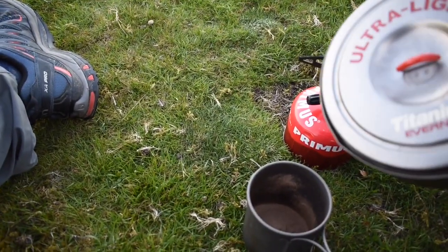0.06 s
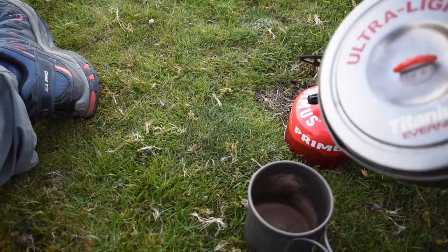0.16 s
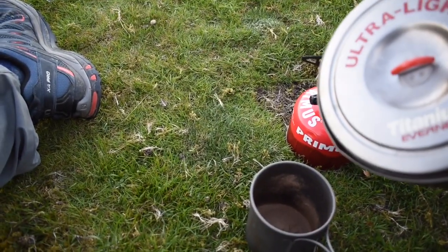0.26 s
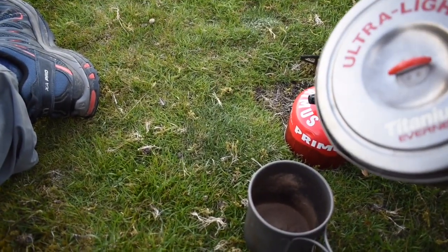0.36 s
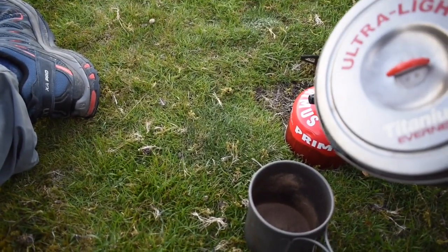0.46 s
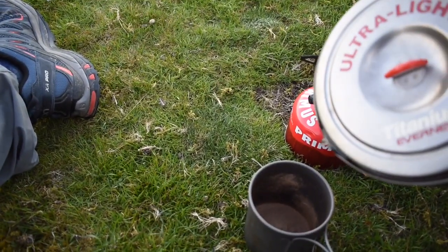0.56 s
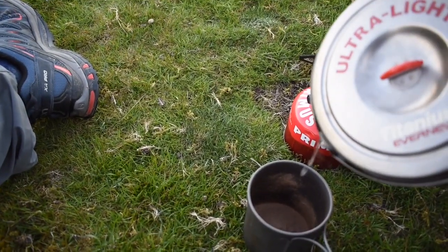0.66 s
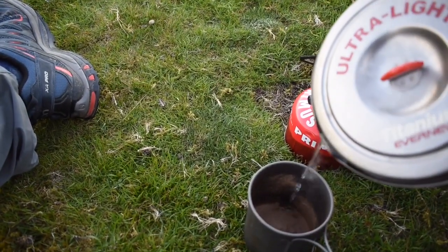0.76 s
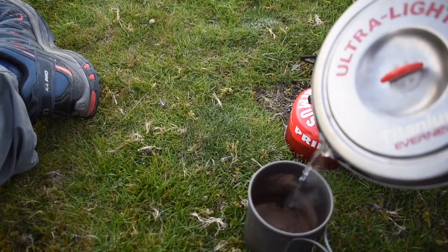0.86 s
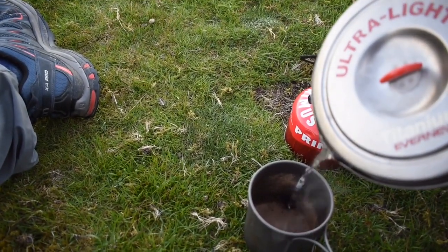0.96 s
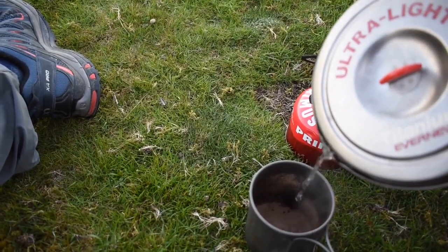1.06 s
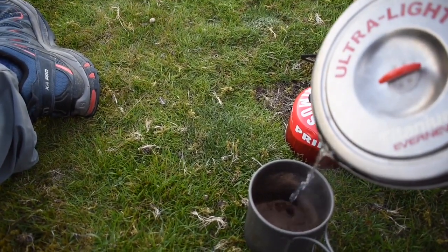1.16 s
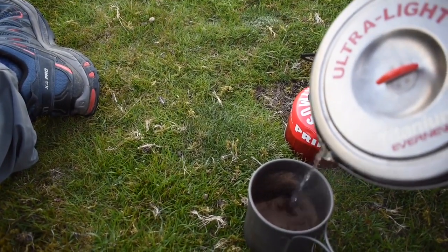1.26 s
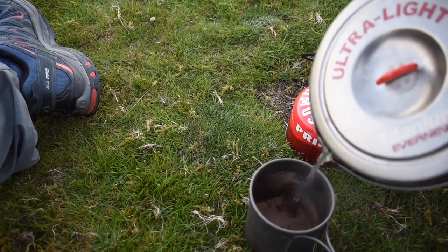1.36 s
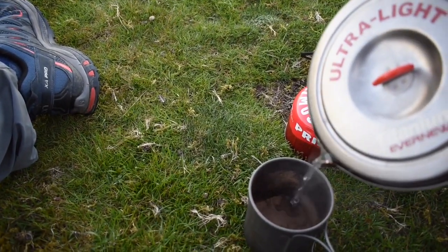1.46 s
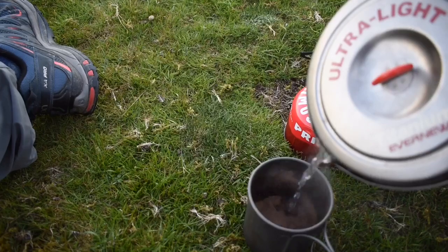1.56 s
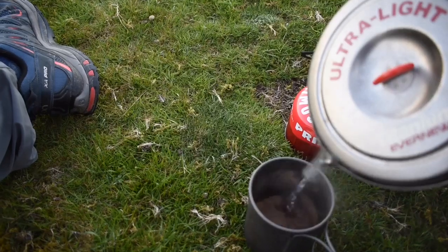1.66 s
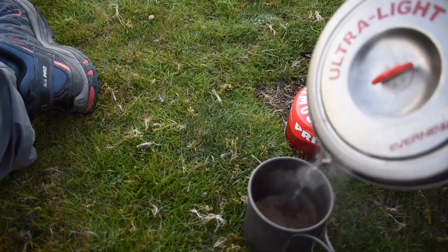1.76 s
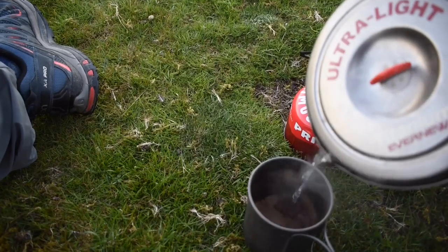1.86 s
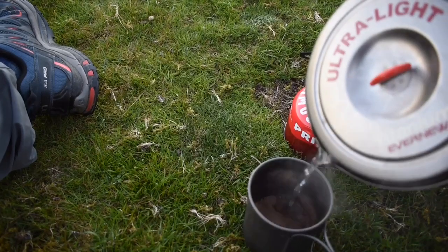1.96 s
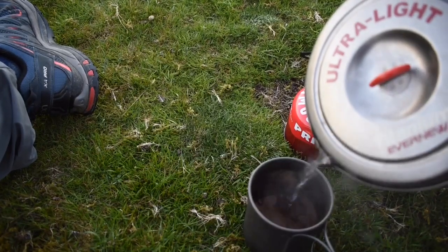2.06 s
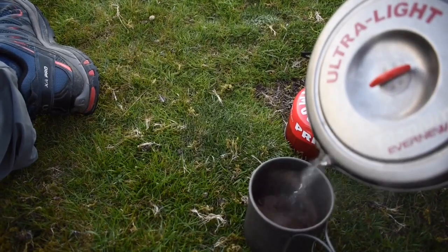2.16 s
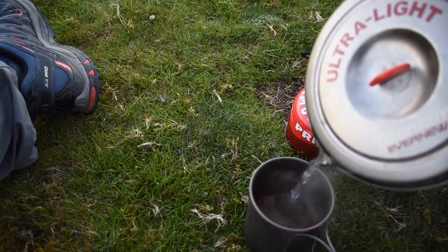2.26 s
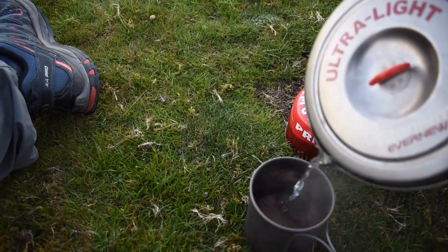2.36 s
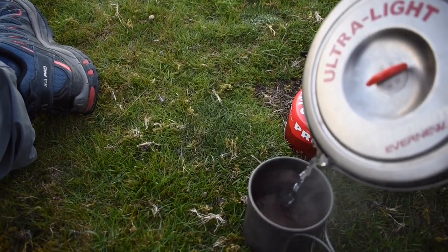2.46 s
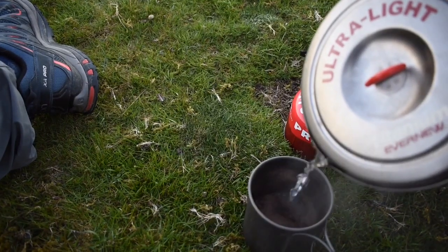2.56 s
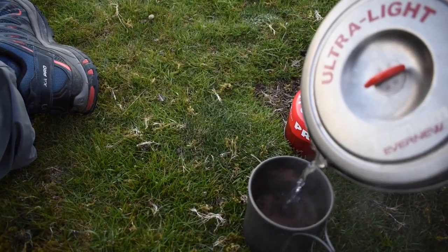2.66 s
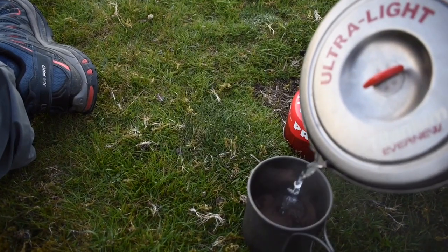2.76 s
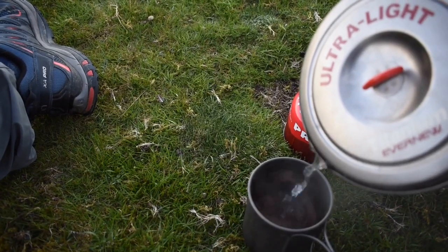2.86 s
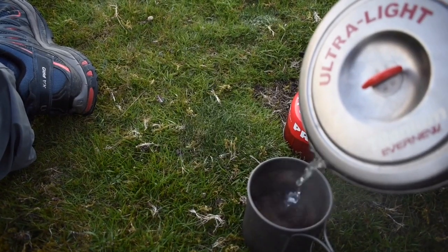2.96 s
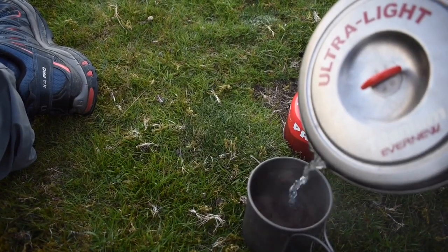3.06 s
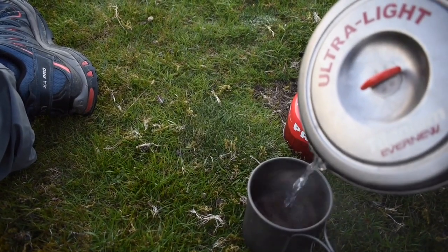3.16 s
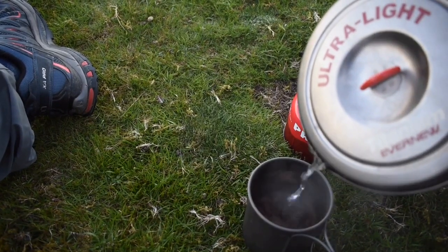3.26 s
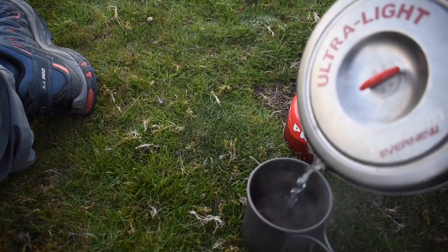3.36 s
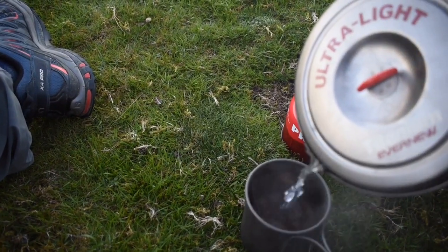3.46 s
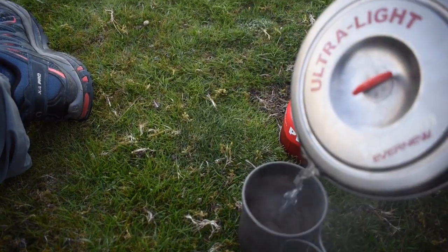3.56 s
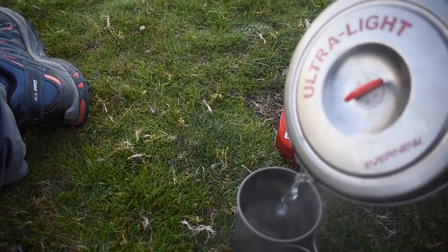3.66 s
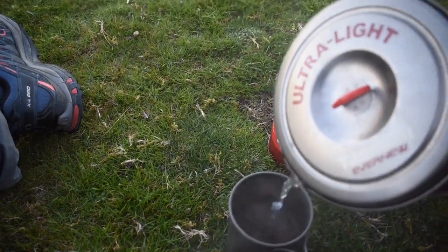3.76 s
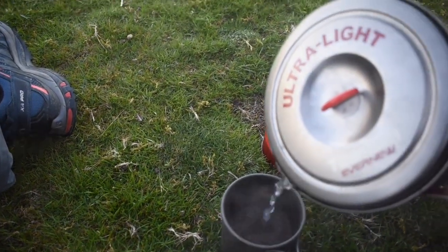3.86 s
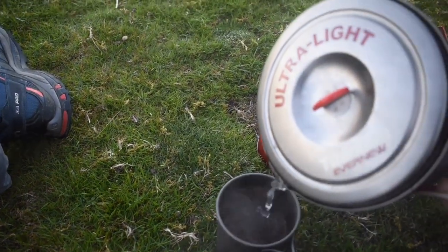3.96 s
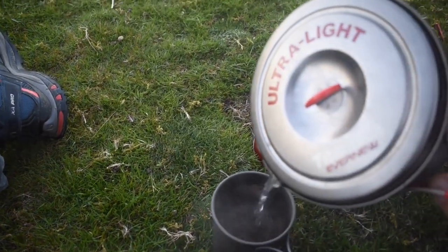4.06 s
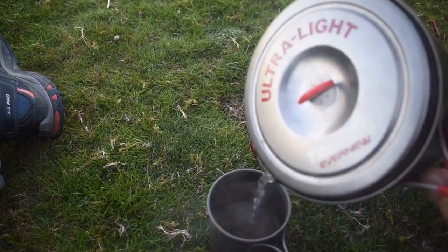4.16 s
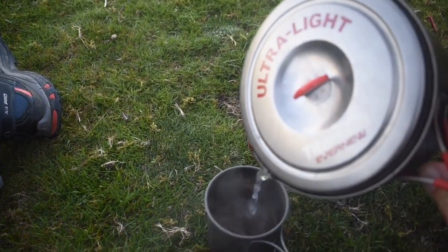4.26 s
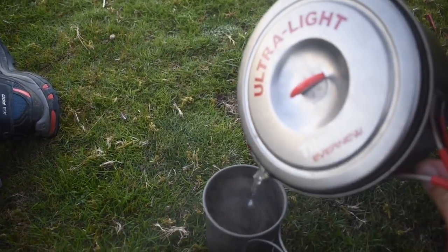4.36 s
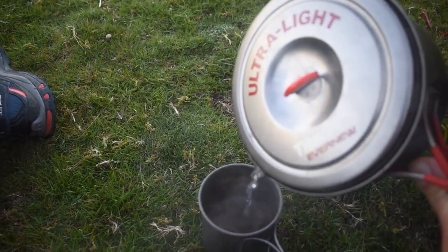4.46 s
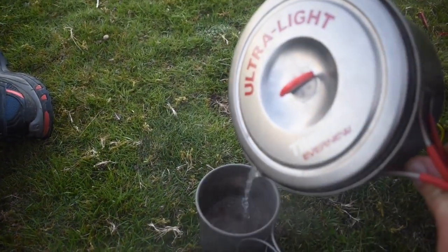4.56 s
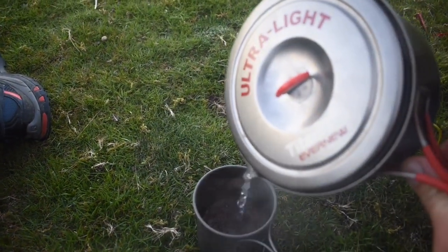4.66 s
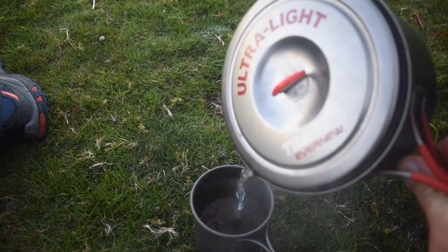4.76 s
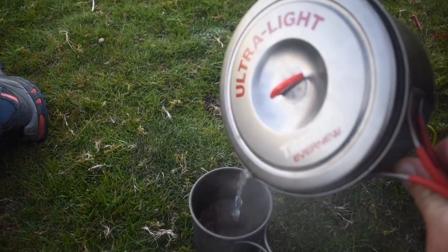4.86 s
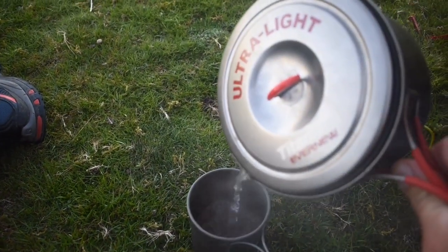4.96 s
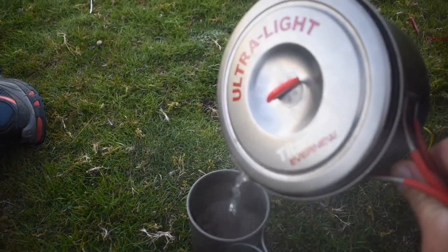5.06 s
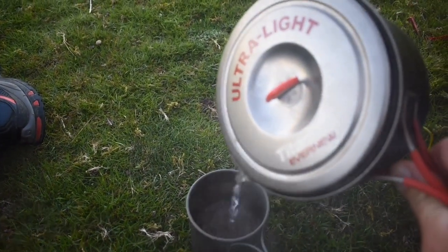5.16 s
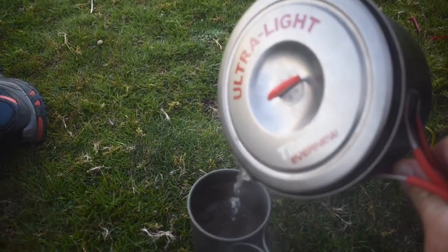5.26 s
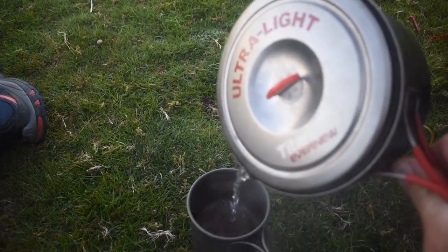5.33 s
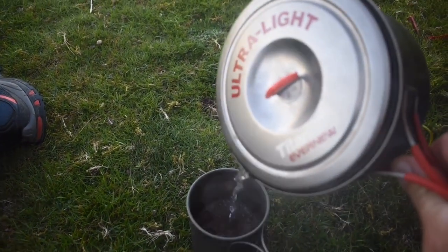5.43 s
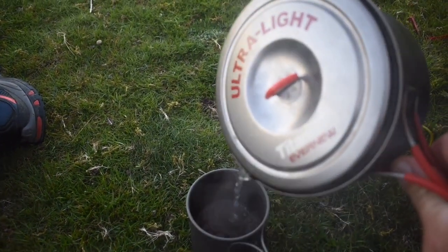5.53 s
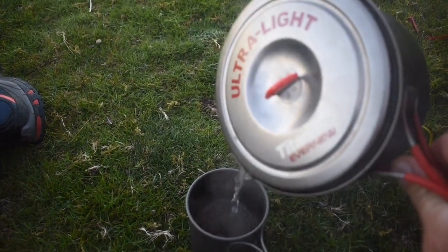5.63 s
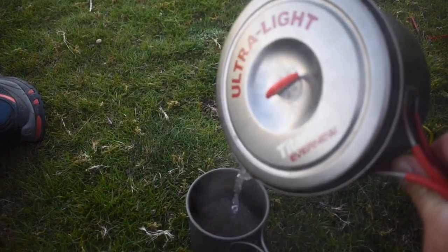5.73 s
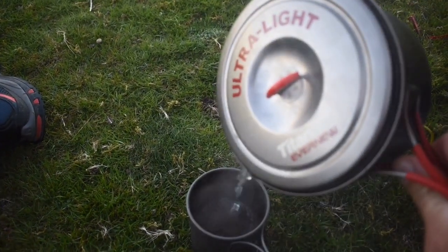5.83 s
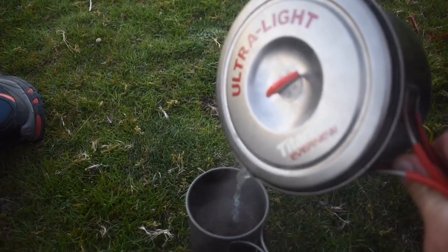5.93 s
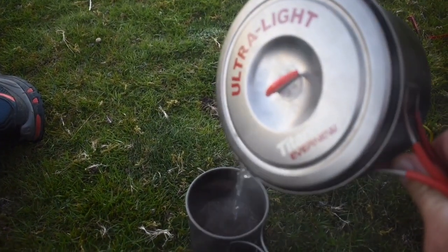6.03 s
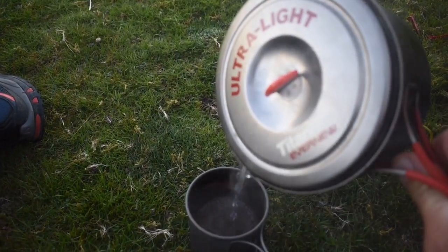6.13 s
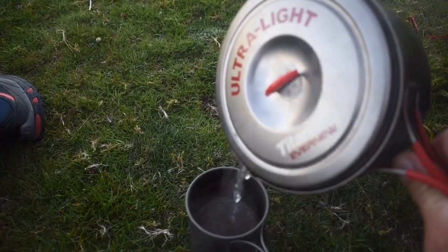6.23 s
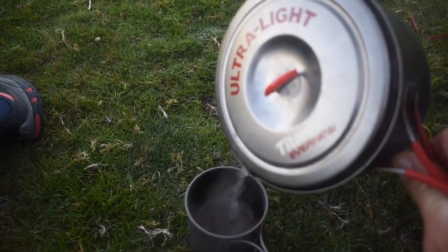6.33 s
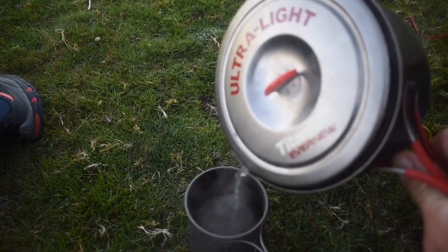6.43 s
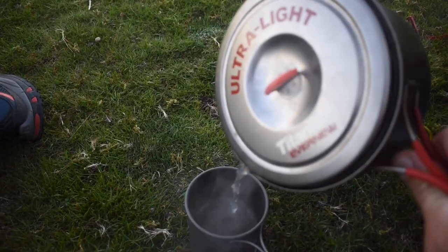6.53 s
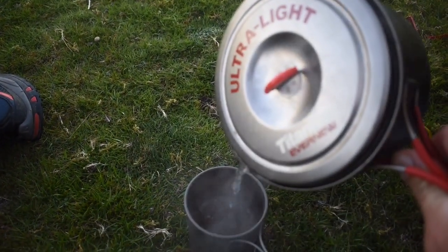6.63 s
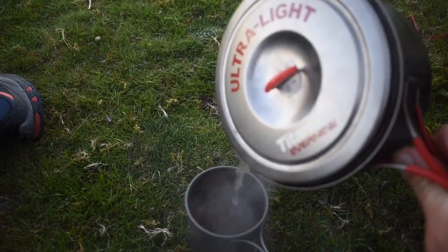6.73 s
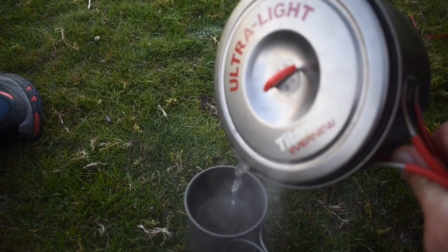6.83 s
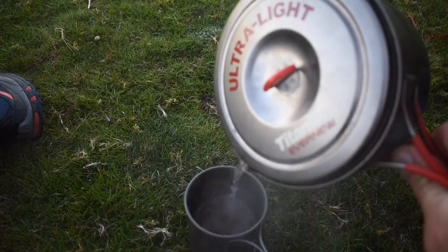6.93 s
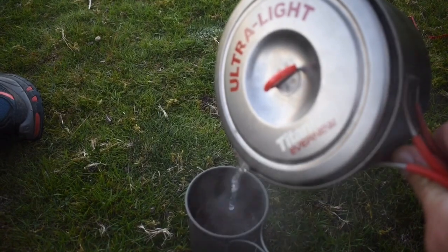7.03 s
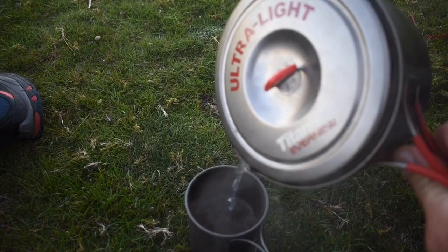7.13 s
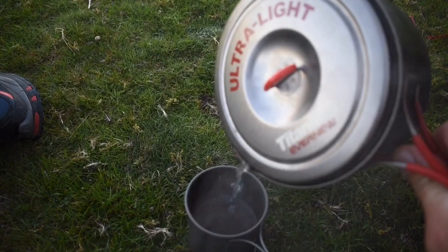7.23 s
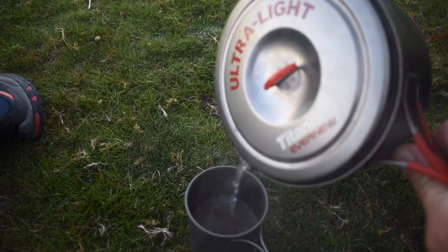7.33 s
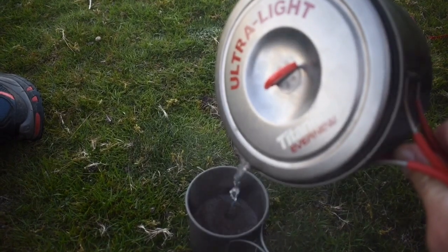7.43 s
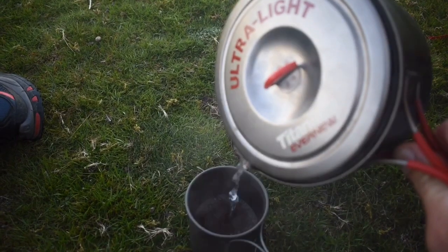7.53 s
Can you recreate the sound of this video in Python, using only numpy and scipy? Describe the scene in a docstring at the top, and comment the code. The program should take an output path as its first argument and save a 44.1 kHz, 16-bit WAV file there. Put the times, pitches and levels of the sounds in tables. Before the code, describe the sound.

Close, dry trickle of water filling a metal mug outdoors: sharp splashy ticks first, then rounder, hollow gurgling plops as the level rises.

```python
"""A thin stream of hot water falls from a camping pot into a metal mug on the grass, outdoors.
The stream breaks into beads: each slaps the surface with a tick and traps a bubble that plops.
Gliding filters are the air in the mug, rising in pitch as it fills; short pulses fizz between the beads.
Bright noise cracks and clear plinks sit on top. The perspective is close: mostly direct sound, a faint short
wash, the microphone's colour on the sound in the mug; behind it still air (noise) and soft cloth rustles."""
import sys
import numpy as np
from scipy import signal
from scipy.fft import rfft, irfft
from scipy.io import wavfile

SR = 44100
rng = np.random.default_rng(int(sys.argv[2]) if len(sys.argv) > 2 else 0)


def waveform_to_disk(signal):
    """Save audio, clipped to [-1, 1], as 16-bit WAV at the path in sys.argv[1]."""
    frames = np.transpose(np.atleast_2d(signal))
    scaled = np.clip(frames, -1, 1) * 32767
    samples = np.round(scaled).astype(np.int16)
    wavfile.write(sys.argv[1], SR, samples)


N = 334719  # samples

# Levels in the tables are relative: filters and trims further on shift them.

# The biggest beads hitting the water:
# (time [s], plop pitch [Hz], plop level [dB], tick pitch [Hz], tick level [dB])
BIG_BEADS = [(0.8586, 650, -36, 5300, -20), (0.9017, 1080, -38.0, 6600, -15.5),
             (0.986, 2170, -15, 4230, -16), (0.9898, 2070, -30, 7000, -9), (1.0135, 2900, -41.0, 6200, -2),
             (1.029, 550, -48, 6400, -0.5), (1.042, 1550, -21, 5700, -14), (1.064, 520, -47.0, 7560, -5),
             (1.0697, 550, -51, 5340, -4.5), (1.0836, 1260, -19, 5850, 11.5), (1.117, 550, -43, 4300, -6),
             (1.1861, 960, -22.5, 6550, -6.5), (1.2135, 1320, -17.5, 5600, 0),
             (1.2853, 2280, -12, 7600, -6), (1.3188, 1750, -27, 5000, -7.5), (1.331, 1160, -18, 6100, -23),
             (1.3675, 1300, -13.5, 7600, -41.0), (1.3993, 715, -25, 5250, -14.5),
             (1.444, 670, -22, 3900, -26), (1.5324, 1150, -16, 5000, -10.5), (1.5776, 910, -17, 5370, -7.5),
             (1.6017, 820, -38, 5600, -8), (1.6758, 930, -17.5, 4400, -20),
             (1.718, 900, -18.5, 6100, -10.5), (1.7697, 685, -23.5, 5900, -6.5),
             (1.8322, 660, -20.0, 3600, -25.0), (1.893, 820, -16.0, 6100, -7.0),
             (1.992, 1230, -31, 6700, -7.5), (2.036, 1180, -19.5, 5000, -4.5),
             (2.062, 1230, -16.5, 6700, -11.0), (2.0988, 1000, -15.5, 3400, -20.5),
             (2.1267, 780, -47, 5600, -3.5), (2.1442, 620, -18.5, 4740, -7.5),
             (2.2831, 750, -20.0, 6560, -8.0), (2.3518, 670, -25.0, 5300, -3.5),
             (2.3842, 664, -15.5, 5100, -14.0), (2.4273, 730, -17.5, 2900, -15.5),
             (2.472, 910, -36, 6300, -4), (2.4979, 1150, -20.5, 3630, -18),
             (2.542, 675, -22.5, 3250, -12.5), (2.5736, 910, -18, 4700, -25.0),
             (2.643, 1170, -37, 4700, -8), (2.6834, 725, -12.5, 5000, -5.0),
             (2.7181, 640, -10.5, 2700, -14.5), (2.7408, 640, -37.0, 6300, -1.5),
             (2.7624, 550, -34, 5100, -9), (2.7842, 590, -22.5, 3820, -9.5),
             (2.8434, 1250, -16.5, 4500, -17.0), (2.9285, 2900, -7.5, 4440, -18),
             (2.966, 674, -13.5, 4100, -7), (3.0553, 820, -33, 6560, -2.5), (3.0667, 1050, -18, 3700, -2.0),
             (3.1025, 610, -35, 6150, -5.0), (3.1354, 670, -30, 5500, -10), (3.143, 740, -35, 6000, -6),
             (3.2077, 1880, -22.0, 5070, -7), (3.262, 670, -34.0, 6170, -2), (3.295, 670, -27, 4900, -1),
             (3.3133, 880, -19, 4050, -10.0), (3.3675, 620, -25, 4930, -10.0),
             (3.373, 660, -13.5, 5600, -25), (3.4475, 670, -26.5, 4700, -8),
             (3.493, 1580, -14.5, 5800, -7.5), (3.5037, 580, -21.5, 3700, -8.5),
             (3.5479, 656, -17.0, 3900, -10.5), (3.6031, 644, -31, 5300, -8),
             (3.651, 876, -19.5, 5000, -6.5), (3.7967, 910, -18, 4700, -14), (3.832, 1434, -17, 5700, -10),
             (3.9083, 780, -15, 6660, -4.5), (3.9143, 670, -28.0, 5300, -6), (3.968, 640, -23.5, 4400, -8),
             (3.9807, 1010, -19.0, 4680, -10), (4.0013, 804, -20, 7140, -11),
             (4.05, 550, -27.5, 4460, -8.5), (4.0938, 950, -15, 4100, -10.5),
             (4.1384, 740, -15.5, 5600, -8.5), (4.2235, 1996, -2.5, 4400, -12),
             (4.2544, 766, -15, 5300, -12), (4.3404, 1170, -20.5, 5300, -11),
             (4.3714, 791, -20.5, 5300, -3), (4.3965, 820, -16, 4100, -7.5), (4.403, 920, -20, 5000, -25),
             (4.4173, 1300, -8.5, 7600, -7.0), (4.4872, 764, -16.5, 4800, -8.5),
             (4.498, 800, -16.0, 4100, -16.0), (4.5574, 820, -19.0, 4400, -3.5),
             (4.617, 1120, -28, 6000, -2.5), (4.6721, 1070, -11.5, 4300, -9),
             (4.7094, 1000, -18, 3700, -16), (4.758, 546, -21.5, 6600, -4.5),
             (4.7801, 1157, -20.0, 4500, -7.5), (4.8092, 865, -16.5, 5000, -9),
             (4.9776, 820, -9.5, 4700, -11), (5.0508, 785, -14.5, 4130, -12),
             (5.074, 875, -16, 4700, -14.5), (5.1193, 870, -13.0, 3670, -9.5),
             (5.1389, 820, -15.5, 4720, -9), (5.1819, 820, -11.5, 4830, -3.5),
             (5.2388, 1110, -8, 4730, -8.0), (5.2696, 1040, -16, 4430, -8.5), (5.3894, 1110, -18, 4954, -8),
             (5.421, 895, -13.5, 2680, -5), (5.5241, 900, -20.5, 4260, -1.5), (5.5452, 903, -17, 3370, -12),
             (5.5601, 820, -11, 3900, -13), (5.5813, 790, -18.5, 3900, -15),
             (5.6035, 880, -11.5, 6600, -8.0), (5.6439, 820, -29, 5200, -7.5),
             (5.8261, 780, -14.0, 4660, -19), (5.8396, 909, -9.5, 5000, -10.5),
             (5.8452, 938, -11, 4880, -15.5), (5.8805, 820, -13.0, 4660, -9.5),
             (5.9147, 845, -10.5, 5000, -14), (6.0092, 2240, 0.5, 5500, -1), (6.0562, 711, -21, 4730, -6),
             (6.084, 710, -36, 7750, -1), (6.1064, 875, -14.5, 3000, -23.0),
             (6.1171, 1030, -3, 5600, -10.0), (6.1242, 1030, -14.0, 5000, -41.0),
             (6.148, 970, -19, 5000, -13.0), (6.216, 1230, -11.0, 5170, -5),
             (6.2642, 1040, -12.5, 6050, -6.5), (6.3086, 810, -14.5, 3900, -9),
             (6.3334, 670, -15, 2930, -3.5), (6.3742, 820, -11.5, 4660, -12),
             (6.3858, 2584, -11.5, 6130, -18.0), (6.4175, 1650, -6.5, 4670, -7.5),
             (6.5162, 2740, -13, 5800, -8), (6.5693, 1170, -12.5, 4500, -4.5),
             (6.6267, 775, -15.5, 4040, -23), (6.7246, 954, -12, 5900, -13.5),
             (6.7486, 820, -16, 4330, -10.5), (6.7594, 1573, -14, 4900, -20),
             (6.8033, 1048, -1.5, 6700, -2.5), (6.8286, 1050, -11.5, 6000, -32.0),
             (6.9335, 1025, -10.5, 3930, -3), (6.9797, 1010, -18, 5300, -8.0),
             (7.0093, 1840, -14.5, 4100, -8), (7.206, 960, -13.5, 4920, 3.5),
             (7.2971, 738, -17, 5275, -7.0), (7.3923, 1060, -10.5, 2710, -16),
             (7.4244, 1124, -17, 5000, -13), (7.4345, 1070, -17.5, 6300, -8.5),
             (7.5422, 1313, -9, 5040, -12)]
# Plops of the small beads: (time [s], level [dB])
SMALL_PLOP_LEVEL = [(1.0, -27.5), (2.5, -25), (3.15, -28.5), (3.7, -28), (4.4, -21.5), (5.5, -26.5),
                    (6.35, -22), (7.59, -23)]
# Small bubbles between the beads: (time [s], gurgle level [dB], fizz level [dB])
FROTH_LEVEL = [(0.8, -65, -61), (1.23, -57, -51), (1.61, -43.5, -46.5), (2.39, -43, -48.5),
               (3.11, -49.5, -43), (4.28, -46, -46), (5.98, -40, -48), (6.25, -37, -46.5), (6.64, -40, -47),
               (7.59, -42.5, -48.5)]
# Long low glugs, heard while the water is still shallow: (time [s], level [dB])
GLUG_LEVEL = [(1.2, -62), (1.45, -55), (1.85, -48), (2.2, -57), (2.8, -53), (3.1, -72)]
# Resonances and dips of the mug, as the pour starts and at its end:
# (start pitch [Hz], end pitch [Hz], Q [1], start level [dB], end level [dB])
MUG_RESONANCES = [(333, 360, 3.8, -4, 12), (400, 530, 3.6, -6, -8.5), (590, 640, 4, 5, 1.5),
                  (758, 765, 7.1, -6.3, -6.8), (841, 985, 8.5, 10.3, 10), (1195, 1250, 5.1, 3.2, 5.4),
                  (2330, 2600, 6.8, -6.5, -4.5), (2655, 3075, 10.7, 12, 7.6), (5190, 5770, 11.7, 5.2, 3.9),
                  (6270, 6630, 13.4, 5.5, 5.5), (7500, 8740, 11.3, -6, -3.2),
                  (10200, 10500, 2.5, -3.5, 1.5)]
# The mug's hollow low note, added to the direct sound: (time [s], level [dB])
HOLLOW_LEVEL = [(1.0, -9), (3.4, -7), (4.2, 6), (5.2, 1.5), (6.2, -9), (7.59, -10)]
# The microphone's colour on the sound in the mug: (frequency [Hz], level [dB])
MIC_COLOUR = [(60, -18), (150, -7.5), (250, 3.5), (600, -6), (1200, -0.83), (2000, -1.5), (4000, -3.5),
              (6500, -1), (7500, -0.5), (8800, -14), (11000, -20), (15000, -34.5)]
# The clearest bubbles that stay whole long enough to ring: (time [s], pitch [Hz], level [dB])
CLEAR_PLINKS = [(1.0276, 6370, -11), (1.475, 840, -19.5), (1.5318, 2400, -20.5), (1.803, 910, -22),
                (1.884, 704, -24), (2.755, 567, -32), (2.7627, 2800, -26), (3.0676, 5380, -12),
                (4.982, 5600, -15), (5.181, 2990, -18.5), (6.5693, 2940, -21.5)]
# Centre pitches of the fainter plinks, near the mug's resonances: (pitch [Hz])
FAINT_PLINK_HZ = (1254, 2830, 2900, 5800, 6200)
# Drops cracking against the metal wall: (time [s], level [dB])
WALL_CRACKS = [(1.0825, -46), (1.185, -37), (1.3175, -41), (1.3455, -42), (1.9915, -41), (2.3156, -35.5),
               (2.6824, -53), (3.0545, -36), (3.295, -42), (3.584, -34), (4.339, -42), (4.3701, -43),
               (4.3955, -40), (4.7791, -44), (5.1812, -41), (5.2378, -33.5), (5.2673, -46), (5.524, -44),
               (6.0822, -25.5), (6.146, -35), (6.1899, -43), (6.263, -37), (6.4634, -42), (6.5682, -35.5),
               (6.7477, -48), (6.7975, -37), (6.9108, -44), (6.9786, -42), (7.0086, -39), (7.131, -36)]
# The finest spray: (time [s], level [dB])
SPRAY_LEVEL = [(1.0, -76), (2.9, -68), (3.5, -73), (3.85, -57.5), (4.3, -73), (7.59, -79)]
# A sleeve shifts as the pot tips: (time [s], length of swell [s], level [dB])
SLEEVE_RUSTLES = [(0.136, 0.014, -51.5), (0.937, 0.015, -57)]
# Tone of the cloth: (frequency [Hz], level per Hz [dB])
CLOTH_TONE = [(60, -37), (160, -13), (270, -1), (800, -8), (1250, 1), (2000, -10), (4500, -33), (6500, -10),
              (9000, -21), (16000, -40)]
# Tone of the outdoor air: (frequency [Hz], level per Hz [dB])
AIR_TONE = [(12, -36), (20, -5), (27, -27), (65, -18), (96, -17.5), (124, -11), (200, -3.5), (342, 0.5),
            (465, 0.5), (794, 2.5), (2440, -3), (6720, -10.5), (9680, -18.5), (15200, -20.5), (16500, -34)]

POUR_START_S = 1.0
WET_FROM_S = .8  # froth and spray fade in from here until the pour starts
SMALL_BEADS_PER_S = 46
SMALL_PLOP_HZ = 1146
SMALL_TICK_HZ, SMALL_TICK_DB, TICK_FADE_DB_PER_S = 5480, -13, .5
# the stream thins before each big bead, so the small ones pause around it
GAP_BEFORE_S, GAP_AFTER_S = .018, 0.0037
# the trickle takes a moment to reach full strength
TRICKLE_DB, SWELL_S = -14, 0.17
HOLLOW_HZ, HOLLOW_Q = 375, 4.8
FAINT_PLINKS_PER_S, FAINT_PLINK_DB = 8, -29
AIR_DB = -56
CUTOFF_HZ = 15700


def from_db(db):
    """Decibels to gain."""
    return 10 ** (np.asarray(db) / 20)


def rms_one(x):
    """Scale to unit rms."""
    return x / np.sqrt(np.mean(x ** 2) + 1e-20)


def in_time(rows):
    """Each column of a curve at every sample."""
    s, *columns = np.transpose(rows)
    return [np.interp(np.arange(N) / SR, s, column) for column in columns]


def add(out, s, sound):
    """Mix a short sound in at time s."""
    i = int(np.clip(round(s * SR), 0, N - 1))
    out[i:i + len(sound)] += sound[:N - i]


def decay(size, t60):
    """Exponential fade that falls by 60 dB in t60 seconds."""
    return np.exp(-np.log(1000) * np.arange(size) / SR / t60)


def coloured(x, spectrum, size=2048):
    """Causal (minimum-phase) filter with the given (frequency [Hz], level [dB]) response."""
    hz, db = np.transpose(spectrum)
    grid = np.maximum(np.arange(size // 2 + 1) * SR / size, 1)
    gain = from_db(np.interp(np.log(grid), np.log(hz), db))
    # folding the cepstrum onto positive time gives minimum phase
    cepstrum = irfft(np.log(gain))
    cepstrum[1:size // 2] *= 2
    cepstrum[size // 2 + 1:] = 0
    response = irfft(np.exp(rfft(cepstrum)))
    return signal.oaconvolve(x, response)[:N]


def high_passed(x, hz):
    """Second-order bass cut."""
    return signal.sosfilt(signal.butter(2, hz, "high", fs=SR, output="sos"), x + 1e-18)


def scattered(sound, noise, t60):
    """Reflections of a sound from half a millisecond on, dying away; about the same energy as the sound."""
    late = np.arange(len(noise)) / SR > .0005
    tail = noise * decay(len(noise), t60) * late
    return signal.oaconvolve(sound, tail / np.sqrt(np.sum(tail ** 2)))


def pulse(hz, cycles, rise, attack=.001, size=1100):
    """Pulsating bubble: pressure builds over `attack` cycles, dies by 60 dB in `cycles`, pitch rising."""
    turns = hz * np.arange(size) / SR
    age = np.minimum(turns / cycles, 2)
    strength = (1 - np.exp(-turns / attack)) * np.exp(-np.log(1000) * turns / cycles)
    swing = strength * np.sin(2 * np.pi * turns * (1 + rise * age))
    # the slope, scaled back to the size of the swing at hz
    return np.diff(swing, append=0) / (2 * np.sin(np.pi * hz / SR))


def small_beads(plop_octaves=0.54, tick_octaves=0.28, plop_spread_db=5.0, tick_spread_db=4.5, size=560):
    """The stream breaks into small beads at uneven intervals, none close to a big one; rows like BIG_BEADS."""
    s = POUR_START_S + np.cumsum(rng.gamma(2, .5, size)) / SMALL_BEADS_PER_S
    plop_pitch, plop_size, tick_pitch, tick_size = np.clip(rng.standard_normal((size, 4)), -1.7, 1.5).T
    poured_s = s - POUR_START_S
    flow_db = TRICKLE_DB * np.exp(-poured_s / SWELL_S)
    plop_hz = SMALL_PLOP_HZ * 2 ** (plop_octaves * plop_pitch)
    plop_db = np.interp(s, *np.transpose(SMALL_PLOP_LEVEL)) + flow_db + plop_spread_db * plop_size
    tick_hz = SMALL_TICK_HZ * 2 ** (tick_octaves * tick_pitch)
    tick_db = SMALL_TICK_DB + flow_db - TICK_FADE_DB_PER_S * poured_s + tick_spread_db * tick_size
    rows = np.column_stack([s, plop_hz, plop_db, tick_hz, tick_db])
    since_big = s[:, None] - np.array(BIG_BEADS)[:, 0]
    crowded = ((since_big > -GAP_BEFORE_S) & (since_big < GAP_AFTER_S)).any(axis=1)
    return rows[~crowded & (s < N / SR)]


def plops(stream, plop_cycles=5.1, cycles_spread=.2, attack=0.19, rise=0.075, delay_s=0.00023, trim_db=-1.42):
    """Each bead drags air under: a round, quickly damped plop, some ringing longer than others."""
    out = np.zeros(N)
    lucks = np.clip(rng.standard_normal(len(stream)), -2, 2)
    for (s, plop_hz, plop_db, _, _), luck in zip(stream, lucks):
        cycles = plop_cycles * np.exp(cycles_spread * luck)
        add(out, s + delay_s, from_db(plop_db + trim_db) * pulse(plop_hz, cycles, rise, attack))
    return out


def splashes(stream, cycles=7.4, tick_db=-7.5, droplet_db=-10, droplet_lag_s=.0005, droplet_spread_s=.0012,
             pitch_spread=0.26, break_up_s=0.35, rattle_db=-9.5, rattle_t60=0.03, count=4, size=700):
    """Each bead slaps the surface with a tick; droplets that travel with it land just before and after."""
    out = np.zeros(N)
    lucks = rng.standard_normal((len(stream), size + 3 * count))
    for (s, _, _, hz, db), luck in zip(stream, lucks):
        tick = -from_db(db + tick_db) * pulse(hz, cycles, 0)
        add(out, s, tick)
        # every bead lands on another spot, so it rattles between the walls in its own way
        add(out, s, from_db(rattle_db) * scattered(tick, luck[:size], rattle_t60))
        # the first beads fall alone; droplets join them once the stream breaks up
        joined = np.clip((s - POUR_START_S) / break_up_s, 0, 1)
        for when, pitch, weight in np.clip(luck[size:], -2, 2).reshape(count, 3):
            droplet = pulse(hz * np.exp(pitch_spread * pitch), cycles=6.45, rise=0, attack=0.069)
            gain = joined * from_db(db + droplet_db + 0.43 * weight)
            add(out, s + droplet_lag_s + droplet_spread_s * when, gain * droplet)
    return high_passed(out, hz=970)


def bubbles(per_s, low_hz, high_hz, cycles, spread_db, count=14):
    """Small bubbles of random size and pitch burst at random moments; rms 1."""
    sizes = from_db(spread_db * np.minimum(rng.exponential(1, N), 3)) * rng.choice([-1, 1], N)
    born = sizes * (rng.random(N) < per_s / SR)
    dealt = rng.integers(0, count, N)
    out = np.zeros(N)
    for k, hz in enumerate(np.geomspace(low_hz, high_hz, count)):
        out += signal.oaconvolve(born * (dealt == k), pulse(hz, cycles, 0.099))[:N]
    return rms_one(out)


def froth():
    """The churned water between the beads: slow glugs, quicker gurgle and fine fizz."""
    gurgle_db, fizz_db = in_time(FROTH_LEVEL)
    glug_db, = in_time(GLUG_LEVEL)
    glugs = from_db(glug_db) * bubbles(per_s=60, low_hz=540, high_hz=858, cycles=19, spread_db=4.0)
    gurgle = from_db(gurgle_db - 7.5) * bubbles(per_s=150, low_hz=820, high_hz=2200, cycles=13.3, spread_db=4.5)
    fizz = from_db(fizz_db - 3) * bubbles(per_s=420, low_hz=2940, high_hz=8000, cycles=9, spread_db=7.0)
    return glugs + gurgle + fizz


def mug(x, size=2048):
    """The air column shortens as the water rises, so its resonances climb."""
    starts = np.arange(0, N, size)
    fill = np.clip((starts / SR - POUR_START_S) / (N / SR - POUR_START_S), 0, 1)
    for start_hz, end_hz, q, start_db, end_db in MUG_RESONANCES:
        out, state = np.zeros(N), np.zeros(2)
        for i, part in zip(starts, fill):
            # peaking filter, reset block by block while its state carries on
            w = 2 * np.pi * (start_hz + (end_hz - start_hz) * part) / SR
            damping = np.sin(w) / (2 * q)
            lift = damping * from_db(start_db + (end_db - start_db) * part)
            b = [1 + lift, -2 * np.cos(w), 1 - lift]
            a = [1 + damping, -2 * np.cos(w), 1 - damping]
            out[i:i + size], state = signal.lfilter(b, a, x[i:i + size], zi=state)
        x = out
    return x


def hollow(x):
    """Everything in the water also sounds the low note of the whole mug, a fixed resonance."""
    level_db, = in_time(HOLLOW_LEVEL)
    note = signal.lfilter(*signal.iirpeak(HOLLOW_HZ, HOLLOW_Q, fs=SR), x)
    return x + from_db(level_db) * note


def faint_plinks(spread_db=3.0, pitch_spread=0.043, size=120):
    """Faint ringing bubbles at random moments of the pour; rows like CLEAR_PLINKS."""
    s = POUR_START_S + np.cumsum(rng.exponential(1, size)) / FAINT_PLINKS_PER_S
    pitch, strength = np.clip(rng.standard_normal((2, size)), -2, 2)
    hz = rng.choice(FAINT_PLINK_HZ, size) * np.exp(pitch_spread * pitch)
    rows = np.column_stack([s, hz, FAINT_PLINK_DB + spread_db * strength])
    return rows[s < N / SR]


def plinks(rows, cycles_at_1k=28.0, rise=0.017, attack=1.0, level_db=-3.0):
    """Whole bubbles ring as clear little notes; smaller ones ring for more cycles."""
    out = np.zeros(N)
    for s, hz, db in rows:
        cycles = cycles_at_1k * np.sqrt(hz / 1000)
        add(out, s, from_db(db + level_db) * pulse(hz, cycles, rise, attack))
    return out


def faint_cracks(per_s=11, level_db=-51, size=150):
    """Stray droplets reach the wall at random, all at one level; rows like WALL_CRACKS."""
    s = POUR_START_S + np.cumsum(rng.exponential(1, size)) / per_s
    return np.column_stack([s, np.full(size, level_db)])[s < N / SR]


def cracks(rows, t60=0.0099, delay_s=0.0019, level_db=5.0, size=400):
    """A drop that meets bare metal gives a very short, bright crack of noise."""
    out, fade = np.zeros(N), decay(size, t60)
    for (s, db), noise in zip(rows, rng.standard_normal((len(rows), size))):
        add(out, s + delay_s, from_db(db + level_db) * fade * noise)
    return coloured(out, [(2000, -12), (7000, 9), (10000, -4.5), (15500, -9)])


def fine_spray():
    """The finest spray: a dense, high hiss of tiny ringing bubbles."""
    level_db, = in_time(SPRAY_LEVEL)
    return from_db(level_db) * bubbles(per_s=800, low_hz=6900, high_hz=10000, cycles=29, spread_db=10.5)


def surroundings(x, t60=0.015, wet_db=-22, size=6000):
    """A faint, brief wash thrown back by the pot and the ground."""
    return x + from_db(wet_db) * scattered(x, rng.standard_normal(size), t60)[:N]


def rustles():
    """A shifting sleeve: soft bell-shaped swells of cloth noise."""
    t = np.arange(N) / SR
    swell = sum(from_db(db) * np.exp(-.5 * ((t - s) / length) ** 2) for s, length, db in SLEEVE_RUSTLES)
    return swell * rms_one(coloured(rng.standard_normal(N), CLOTH_TONE))


def outdoor_air():
    """Still outdoor air: steady coloured noise with the deepest bass cut."""
    air = from_db(AIR_DB) * rms_one(coloured(rng.standard_normal(N), AIR_TONE))
    return high_passed(air, hz=30)


def scene():
    """Plops, splashes and froth sound through the mug; plinks, cracks and spray join, over the outdoor air."""
    stream = np.vstack([BIG_BEADS, small_beads()])
    wet, = in_time([(WET_FROM_S, 0), (POUR_START_S, 1)])
    water = plops(stream) + splashes(stream) + wet * froth()
    inside = coloured(hollow(mug(water)), MIC_COLOUR)
    ringing = plinks(np.vstack([CLEAR_PLINKS, faint_plinks()]))
    wall = cracks(np.vstack([WALL_CRACKS, faint_cracks()]))
    pour = surroundings(inside + ringing + wall + wet * fine_spray())
    return (pour + rustles() + outdoor_air())[None]


def record(dry):
    """Peaks stop at full scale, then the top is cut steeply."""
    top_cut = signal.ellip(10, .1, 70, CUTOFF_HZ, fs=SR, output="sos")
    return signal.sosfilt(top_cut, np.clip(dry, -1, 1))


dry = scene()
out = record(dry)
waveform_to_disk(out)
```